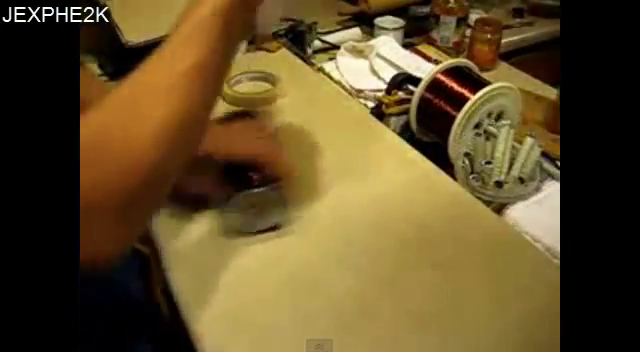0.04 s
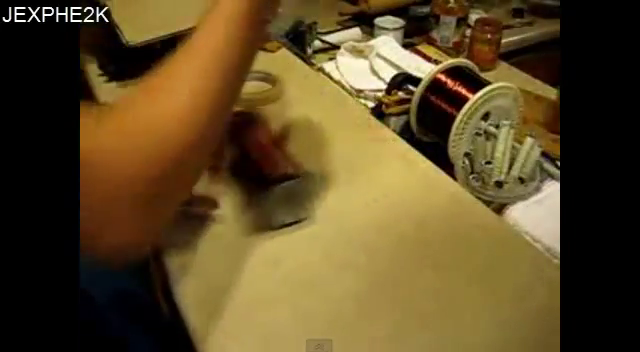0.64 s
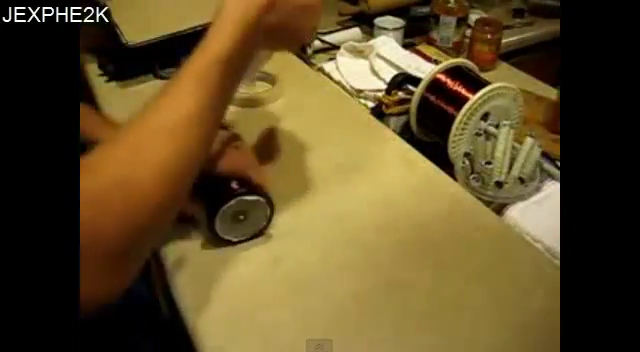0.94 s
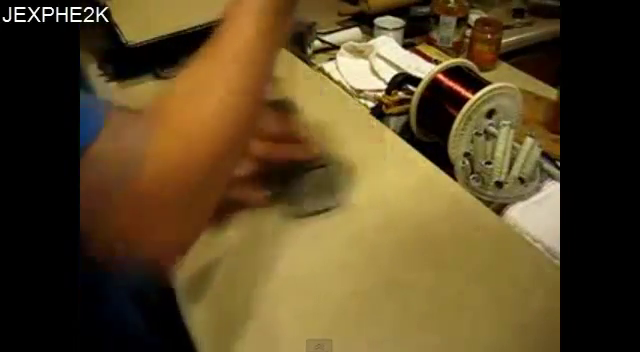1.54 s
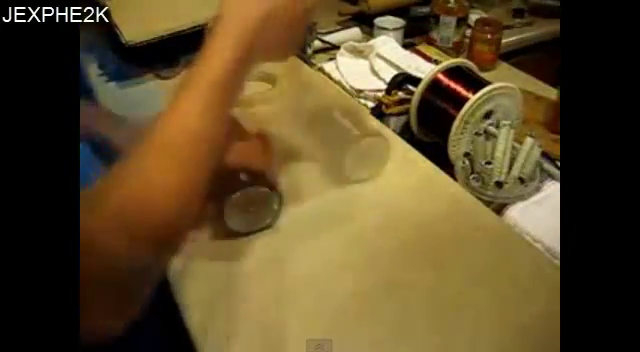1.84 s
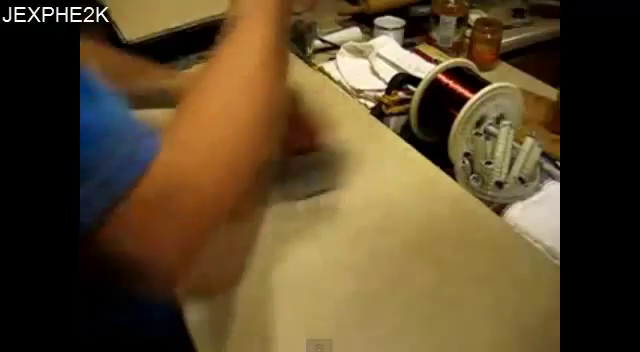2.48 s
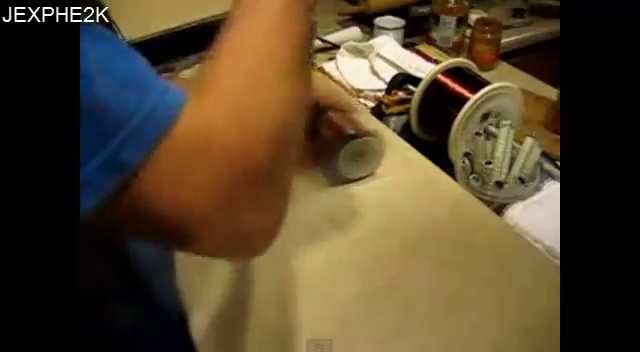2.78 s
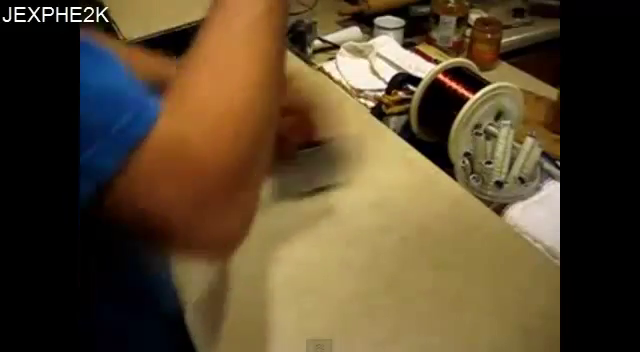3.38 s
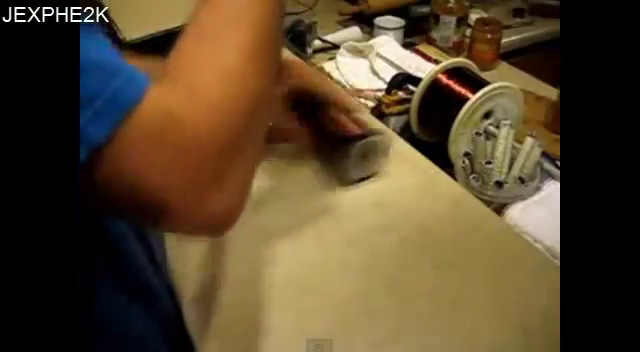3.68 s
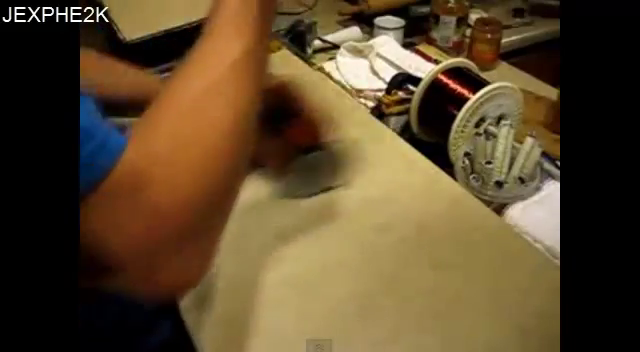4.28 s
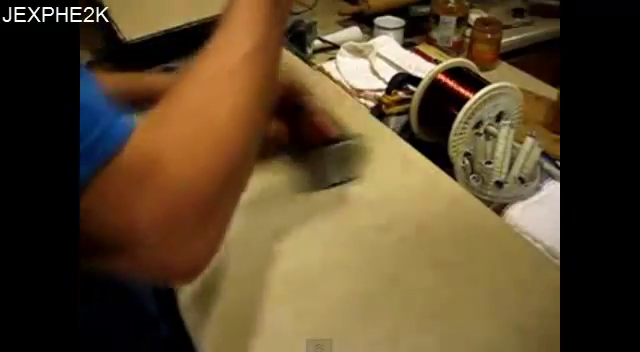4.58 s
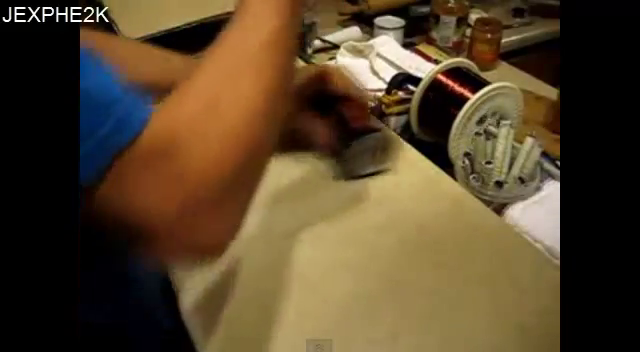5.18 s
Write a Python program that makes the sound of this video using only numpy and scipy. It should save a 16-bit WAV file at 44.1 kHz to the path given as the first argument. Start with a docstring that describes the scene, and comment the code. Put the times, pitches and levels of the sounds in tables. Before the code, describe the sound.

A coil rolls back and forth on a hollow countertop with knocks and rumbles, as copper wire hisses and ticks onto it.

```python
"""First comes a cluster of hollow bumps and a rumble: a coil rolling on a countertop in a small room.
A hand rolls it to and fro to wind copper wire onto it. With each turn the coil knocks and patters
on the hollow counter, while the wire hisses as it slides over the windings.
Now and then the taut wire snaps into place with a tick. Between turns the coil slides softly
in the hand, and a faint hum lies underneath."""
import sys
import numpy as np
from scipy import signal
from scipy.fft import rfft, irfft
from scipy.io import wavfile
from scipy.ndimage import uniform_filter1d

SR = 44100
rng = np.random.default_rng(int(sys.argv[2]) if len(sys.argv) > 2 else 0)


def wav_record(signal):
    """Record a signal, one row per channel, as 16-bit PCM in the file named by sys.argv[1]."""
    frames = np.transpose(np.atleast_2d(signal))
    bounded = np.clip(frames, -1, 1)
    # unit amplitude maps onto the largest positive 16-bit level
    quanta = np.round(bounded * 32767).astype(np.int16)
    wavfile.write(sys.argv[1], SR, quanta)


N = 230503
TIME = np.arange(N) / SR

# Tone colours say how strong each pitch is. Each row: frequency in Hz, relative level in dB.
AIR_COLOUR = [(25, -11.5), (55, 4.5), (76, -12.5), (100, 0.5), (125, 0.5), (170, 0.5), (240, 4), (420, 3.5),
              (620, 1), (1100, -0.5), (2000, -10.5), (4200, -17), (5500, -12.5), (7000, -35), (9000, -59)]
SLIDE_COLOUR = [(200, -16), (500, -0.5), (750, 1), (1100, -2.5), (1600, -3), (2200, -9.5), (3500, -16.5),
                (7000, -38.5)]
TICK_COLOUR = [(300, -20.5), (900, -14), (1900, -1), (2600, 5), (3600, 9), (4400, 2), (5300, -1),
               (7000, -14.5)]
HISS_COLOUR = [(500, -39), (1400, -1.5), (2200, 1), (3200, -0.5), (4400, 0.5), (5500, -3.5), (6400, -4),
               (7200, -9.5)]
RIM_COLOUR = [(300, -14), (550, 1), (720, 13.5), (1000, 0.5), (1300, -33), (2000, -20), (7000, -51)]
SCRAPE_COLOUR = [(200, -11), (500, -2), (700, 3), (1100, -5.5), (1500, -3.5), (2100, -8), (3500, -13.5),
                 (7000, -46.5)]
RUMBLE_COLOUR = [(25, -23), (55, -4), (78, -16.5), (130, -26), (200, 1.5), (270, -1.5), (400, -5.5),
                 (600, -14), (900, -10.5), (2000, -52.5), (7000, -79)]
BUMP_COLOUR = [(30, -20), (100, -25.5), (190, -12.5), (250, 6.5), (320, 5.5), (480, -0.5), (900, -1.5),
               (1500, -3.5), (2200, -6), (4000, -3), (5200, -17), (7000, -38)]
# The room's echo. Each row: frequency in Hz, seconds it takes to fade by 60 dB.
ROOM_FADE = [(100, 0.081), (300, 0.24), (800, 0.35), (2500, 0.13), (7000, 0.19)]
# The faint hum. Each row: frequency in Hz, level in dB.
HUM_TONES = [(237, -63), (409, -66.5)]

# Modes are the pitches at which a thing likes to ring.
# Each row: frequency in Hz, width in Hz, relative strength in dB.
WIRE_MODES = [(2723, 44, 6), (3000, 53, 1), (3683, 17, 3.5), (5525, 19, 10)]  # the taut wire and its spool
SINGING_MODES = [(3940, 45, -3), (4467, 39, -1)]  # thin tones of the taut wire
COUNTER_MODES = [(222.3, 67, 7.5), (264.6, 33, 4), (295.7, 35, 5.5), (398.5, 67, 8.5), (461.5, 31, 6),
                 (533, 69, 4), (726, 40, 2.5), (850, 65, -2), (1070, 160, 4), (1153, 44, 3.5)]  # the counter under the coil
BOOM_MODES = [(101.5, 12.5, -1), (164, 18.4, -5)]  # deep tones of the hollow counter

# The wire keeps feeding off its spool. Each row: time in seconds, hiss level in dB.
WIRE_FEED = [(0, -43.5), (.45, -52.5), (.92, -55), (1.3, -52), (1.85, -51.5), (2.15, -52), (2.65, -57),
             (2.95, -50.5), (3.58, -61), (3.72, -57), (3.92, -63.5), (4.4, -59), (4.55, -53.5),
             (5.2, -51.5)]
# The held coil never quite rests on the counter. Each row: time in seconds, rumble level in dB.
JOSTLE = [(0, -35.5), (.36, -45), (.45, -48.5), (.56, -45.5), (.8, -45), (.88, -55), (.93, -44.5),
          (1.3, -41), (1.36, -37.5), (1.83, -50), (2.1, -48), (2.17, -49.5), (2.6, -50), (2.8, -67),
          (3.55, -61), (3.75, -52), (3.92, -57.5), (4.36, -59.5), (4.7, -54)]
# The coil slides in the hand. Each row: start in seconds, length in seconds, level in dB.
SLIDES = [(0.498, 0.094, -42.5), (0.856, 0.064, -53), (1.816, 0.085, -48), (2.673, 0.56, -53.5),
          (3.675, 0.038, -45.5), (3.765, 0.032, -67), (4.478, .02, -48), (4.567, .02, -55)]
# The wire snaps into place. Each row: start in seconds, relative tick level in dB,
# fade time of the slip in seconds, level of the coil's ring in dB.
SNAPS = [(0.0426, -17, 0.00055, -47), (0.3288, -19.5, .0014, -35.5), (.4100, -30, .002, -56),
         (.792, -30, .004, -56), (1.2600, -22, 0.0051, -28.5), (1.667, -22.5, 0.011, -40),
         (1.826, -34.5, .003, -57), (2.196, -31.5, .006, -44), (3.442, -35, 0.0035, -60),
         (3.9755, -32, 0.0011, -64), (4.279, -22.5, 0.0015, -55), (4.497, -33, 0.0031, -69),
         (4.585, -35, .003, -58), (4.705, -44, .008, -66), (4.849, -23.5, 0.0035, -60),
         (5.1378, -27, 0.0029, -50)]
# The hand rolls the coil. Each row: start in seconds, length of the push in seconds, rumble in dB,
# sag of the rumble in dB per second, boom in dB, rim scrape in dB, wire hiss in dB,
# seconds for the wire to tighten, basic fade after the push in dB per second.
ROLLS = [(0.0, 0.23, -26.5, 30, -28.5, -37, -40, .12, 151),
         (.645, 0.13, -53, 14, -43.5, -47, -51.5, 0.066, 136),
         (0.964, 0.24, -40, 9, -33, -43, -47, 0.056, 169),
         (1.367, 0.27, -22.5, 38.5, -30.5, -29.5, -41, 0.097, 116),
         (1.893, 0.16, -31.5, 36, -37.5, -39.5, -49, 0.088, 108),
         (2.213, 0.17, -26.5, 8, -32.5, -35, -46.5, .07, 129),
         (2.365, .15, -28, 15, -30, -32, -38, 0.073, 141),
         (3.133, 0.3, -27.5, 35, -35.5, -37, -47, 0.056, 165),
         (3.978, 0.21, -24.5, 54, -32.5, -34, -43.5, 0.11, 123),
         (4.824, 0.24, -26, 20, -30.5, -30.5, -41.5, 0.086, 113)]
# The coil bumps on the counter. Each row: start in seconds, level in dB, # frequency in Hz above which the bump
# is dulled (a light tap can be the brightest).
BUMPS = [(.017, -20.5, 400), (0.039, -13.5, 507), (.085, -16, 450), (0.0997, -18, 380), (.111, -23, 396),
         (.174, -21.5, 306), (0.987, -30, 500), (1.005, -25.5, 1200), (1.3903, -14, 1000),
         (1.419, -17, 600), (1.436, -13.5, 445), (1.451, -12, 813), (1.478, -14.5, 450), (1.507, -13, 905),
         (2.225, -28, 400), (2.2343, -16.5, 760), (2.246, -14, 450), (2.268, -10, 1170), (2.275, -20, 500),
         (2.2968, -11, 1000), (2.377, -17.5, 550), (2.9587, -8.5, 1650), (3.112, -23.5, 900),
         (3.150, -23, 800), (3.162, -16, 500), (3.2516, -15, 890), (3.967, -28.5, 600), (3.979, -25, 450),
         (4.0024, -19, 447), (4.0184, -15, 970), (4.0472, -9, 1250), (4.070, -14, 900), (4.149, -20.5, 450),
         (4.495, -32.5, 2400), (4.796, -30, 400), (4.8463, -15, 800), (4.862, -19, 600),
         (4.8994, -13.5, 420), (4.9312, -11, 1100), (4.9621, -8.5, 1700)]


def amp(db):
    """Turns decibels into a gain, the number a sound is multiplied by."""
    return 10 ** (np.asarray(db) / 20)


def unit(x):
    """Scales a sound to an average (rms) level of 1."""
    return x / np.sqrt(np.mean(x ** 2) + 1e-20)


def value_at(points, hz):
    """Looks up a table between its rows, on a scale of pitch (log frequency)."""
    f, value = np.transpose(points)
    return np.interp(np.log(hz + 1), np.log(f + 1), value)


def gain_curve(points):
    """Joins rows of seconds and dB into a gain that changes over time."""
    return amp(np.interp(TIME, *np.transpose(points)))


def add(mix, start, sound):
    """Mixes a sound in at a start time in seconds."""
    part = mix[max(round(start * SR), 0):][:len(sound)]
    part += sound[:len(part)]


def smoothed(x, seconds):
    """Irons out quick changes by taking a running average twice."""
    size = max(int(seconds * SR), 2)
    return uniform_filter1d(uniform_filter1d(x, size), size)


def steadied(x, seconds):
    """Evens out slow swells, so that the hand alone sets the level."""
    return x / np.sqrt(abs(smoothed(x ** 2, seconds)) + 1e-12)


def tap_response(colour, modes=(), dull_above_hz=None, size=8192):
    """How a thing with this colour and these modes answers one tap; the treble can be dulled above a given
    pitch."""
    hz = np.fft.rfftfreq(size, 1 / SR)
    db = value_at(colour, hz)
    for f, width, lift in modes:
        db = db + lift / (1 + (2 * (hz - f) / width) ** 2)
    if dull_above_hz:
        db = db - 10 * np.log10(1 + (hz / dull_above_hz) ** 4)
    # Folding the cepstrum (minimum phase) makes all the ringing come after the tap.
    cepstrum = irfft(np.log(amp(db)))
    cepstrum[1:size // 2] *= 2
    cepstrum[size // 2 + 1:] = 0
    ringing = irfft(np.exp(rfft(cepstrum)))[:size // 2]
    return ringing / abs(ringing).max()


def room(x, echo_db, size=20000, gap_s=0.0018, build_s=0.016):
    """Adds dense echoes off nearby walls and clutter; the middle pitches last longest."""
    t = np.arange(size) / SR
    echoes = rng.standard_normal(size) * np.clip((t - gap_s) / build_s, 0, 1)
    hz, age_s, spectrum = signal.stft(echoes, SR, nperseg=256)
    fade = amp(-60 * age_s / value_at(ROOM_FADE, hz)[:, None])
    tail = signal.istft(spectrum * fade, SR, nperseg=256)[1]
    return x + amp(echo_db) * signal.fftconvolve(x, tail / np.linalg.norm(tail))[:N]


def rub(colour, modes, clicks_per_s, spread_db, smooth, echo_db):
    """Tiny uneven contacts and smooth friction ring a thing and the room, at a steady level of 1."""
    clicks = (rng.random(N) < clicks_per_s / SR) * rng.choice([-1, 1], N)
    strengths = amp(spread_db * np.clip(rng.standard_normal(N), -2, 2))
    friction = unit(clicks * strengths) + smooth * rng.standard_normal(N)
    ringing = signal.fftconvolve(friction, tap_response(colour, modes))[:N]
    return steadied(room(ringing, echo_db), seconds=0.032)


def steady_ring(modes):
    """Steady friction keeps narrow modes ringing, at a level of 1."""
    hz = np.fft.rfftfreq(N, 1 / SR)
    friction = rfft(rng.standard_normal(N))
    body = sum(amp(db) / (1 + 1j * (hz - f) / width) ** 3 for f, width, db in modes)
    return steadied(irfft(friction * body, N), seconds=0.067)


def stroke(start, length, rise_s, sag_db_per_s, fade_db_per_s):
    """Gain of one movement: it swells, sags during the push (grows if the sag is negative), then fades."""
    t = np.maximum(TIME - start, 0)
    drop_db = sag_db_per_s * np.minimum(t, length) + fade_db_per_s * np.maximum(t - length, 0)
    return np.minimum(t / rise_s, 1) * amp(-drop_db)


def settling(fade_db_per_s, delay_s=0.0052):
    """Gain of a motion that starts just after the loudest bump and dies away."""
    start = max(BUMPS, key=lambda bump: bump[1])[0] + delay_s
    return stroke(start, length=0, rise_s=0.014, sag_db_per_s=0, fade_db_per_s=fade_db_per_s)


def background(air_db=-53.5, waver=0.008):
    """Room air and a faint hum whose pitch wavers."""
    air = unit(signal.fftconvolve(rng.standard_normal(N), tap_response(AIR_COLOUR))[:N])
    drift = 1 + waver * unit(uniform_filter1d(rng.standard_normal(N), size=4000))
    hum = sum(amp(db) * unit(np.sin(2 * np.pi * np.cumsum(hz * drift) / SR)) for hz, db in HUM_TONES)
    return amp(air_db) * air + hum


def coil_slides():
    """The coil rubs softly as it shifts in the hand between rolls."""
    gain = sum(amp(db) * stroke(start, length, rise_s=0.018, sag_db_per_s=7.5, fade_db_per_s=82)
               for start, length, db in SLIDES)
    friction = rub(SLIDE_COLOUR, COUNTER_MODES, clicks_per_s=600, spread_db=2.5, smooth=0.84, echo_db=-7)
    return gain * friction


def wire_hiss(pull, sing_db=-53, full_pull_db=-45.5, sing_growth=1.7):
    """Wire slides over the windings in fine slips; its thin singing grows with the pull up to a limit."""
    hiss = rub(HISS_COLOUR, WIRE_MODES, clicks_per_s=1800, spread_db=0.5, smooth=0.94, echo_db=-9)
    tautness = np.minimum(pull / amp(full_pull_db), 1)
    singing = amp(sing_db) * tautness ** sing_growth * steady_ring(SINGING_MODES)
    return pull * hiss + singing


def wire_snaps(ring_hz=673, ring_s=0.066, swell_s=0.0092, tick_db=0.5, slip_db=-2):
    """The taut wire snaps into place with a tick and a short slip, and the coil rings briefly."""
    ticks, rings = np.zeros(N), np.zeros(N)
    t = np.arange(SR // 4) / SR
    tick = tap_response(TICK_COLOUR)
    swell = 1 - np.exp(-(t / swell_s) ** 2)
    ring = np.sin(2 * np.pi * ring_hz * t) * amp(-60 * t / ring_s) * swell
    for start, db, slip_s, ring_db in SNAPS:
        slip = rng.standard_normal(len(t)) * np.exp(-t / slip_s) * (t > .0005)  # just after the tick
        slip = signal.fftconvolve(slip, tick)
        slip *= np.linalg.norm(tick) / np.linalg.norm(slip)
        add(ticks, start, amp(db + tick_db) * tick)
        add(ticks, start, amp(db + slip_db) * slip)
        add(rings, start, amp(ring_db) * ring / ring.max())
    return room(ticks, echo_db=-7.5) + rings


def rim_chatter(level_db=-25.5):
    """After the loudest bump the rim makes quick little bounces on the counter that die away."""
    gain = amp(level_db) * settling(fade_db_per_s=173)
    return gain * rub(RIM_COLOUR, COUNTER_MODES, clicks_per_s=240, spread_db=-3, smooth=0.19, echo_db=1)


def hand_motion(jostle_share_db=-9, rocking_db=-26.5, rumble_fade_ratio=1.4):
    """Gains for rumble, boom, scrape and wire pull: the rolls plus the small motions between them."""
    rocking = amp(rocking_db) * settling(fade_db_per_s=97)  # the coil rocks to rest
    jostle = gain_curve(JOSTLE) + rocking
    light_jostle = amp(jostle_share_db) * jostle
    motions = [(jostle, light_jostle, light_jostle, gain_curve(WIRE_FEED))]
    for start, length, rumble_db, sag, boom_db, scrape_db, hiss_db, tighten_s, fade in ROLLS:
        rumble = stroke(start, length, 0.043, sag, rumble_fade_ratio * fade)  # rises in 0.043 s
        boom = stroke(start, length, rise_s=0.052, sag_db_per_s=4.5, fade_db_per_s=fade)
        scrape = stroke(start, length, rise_s=0.055, sag_db_per_s=34, fade_db_per_s=fade)
        pull = stroke(start, length, rise_s=tighten_s, sag_db_per_s=-6.5, fade_db_per_s=fade)
        motions.append((amp(rumble_db) * rumble, amp(boom_db) * boom,
                        amp(scrape_db) * scrape, amp(hiss_db) * pull))
    return np.linalg.norm(motions, axis=0)  # overlapping motions add their power


def counter_boom(gain):
    """The weight of the rolling coil shakes the deep modes of the hollow counter."""
    return gain * steady_ring(BOOM_MODES)


def coil_rolling(rumble_gain, scrape_gain):
    """The ridged windings patter over the counter and the rim scrapes along."""
    patter = rub(RUMBLE_COLOUR, COUNTER_MODES, clicks_per_s=260, spread_db=3.5, smooth=0.39, echo_db=-6.5)
    scrape = rub(SCRAPE_COLOUR, COUNTER_MODES, clicks_per_s=500, spread_db=1, smooth=0.6, echo_db=-3)
    return rumble_gain * patter + scrape_gain * scrape


def coil_bumps(rattle_db=-9.5, rattle_s=0.0038, rattle_above_hz=610):
    """Each bump is one short push into the counter, followed by a brief, thin rattle of the rim."""
    knocks = np.zeros(N)
    t = np.arange(SR // 20) / SR
    bass_cut = signal.butter(2, rattle_above_hz, "high", fs=SR)
    for start, db, dull_above_hz in BUMPS:
        knock = tap_response(BUMP_COLOUR, COUNTER_MODES, dull_above_hz)
        add(knocks, start, -amp(db) * knock)
        bounces = rng.standard_normal(len(t)) * (t / rattle_s) * np.exp(-t / rattle_s)
        bounces = signal.lfilter(*bass_cut, bounces / np.linalg.norm(bounces))
        add(knocks, start, amp(db + rattle_db) * signal.fftconvolve(bounces, knock))
    return room(knocks, echo_db=-8.5)


def scene(grip_wobble_db=1.39, grip_wobble_s=0.023):
    """One hand drives the coil and the wire together; its grip is a little uneven."""
    rumble, boom, scrape, pull = hand_motion()
    grip = amp(grip_wobble_db * unit(smoothed(rng.standard_normal(N), grip_wobble_s)))
    rolling = coil_rolling(rumble, scrape * grip) + counter_boom(boom)
    coil = rolling + coil_bumps() + rim_chatter() + coil_slides()
    wire = wire_hiss(pull * grip) + wire_snaps()
    return (coil + wire + background())[None]


def record(dry, top_hz=7250):
    """A small microphone misses the highest treble."""
    treble_cut = signal.firwin(401, top_hz, window=("kaiser", 9), fs=SR)
    return signal.oaconvolve(dry, treble_cut[None], "same")


dry = scene()
out = record(dry)
wav_record(out)
```